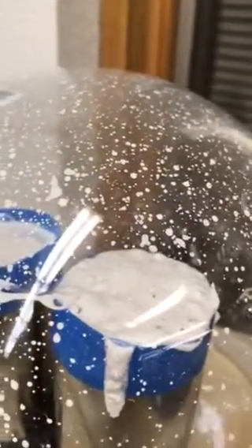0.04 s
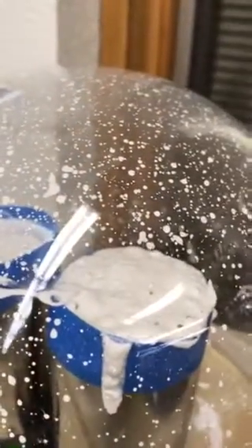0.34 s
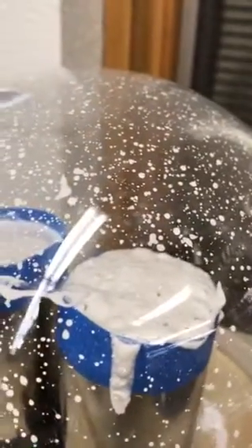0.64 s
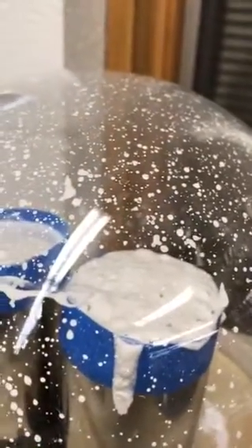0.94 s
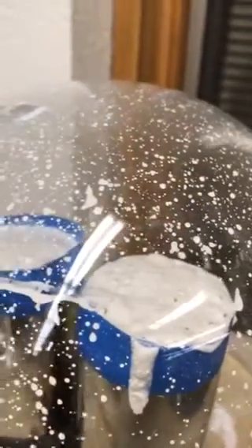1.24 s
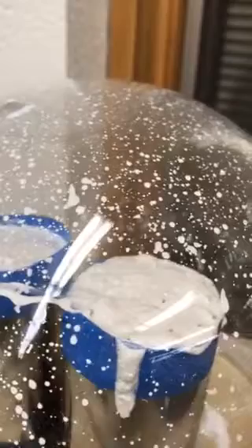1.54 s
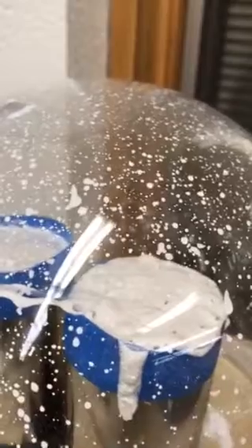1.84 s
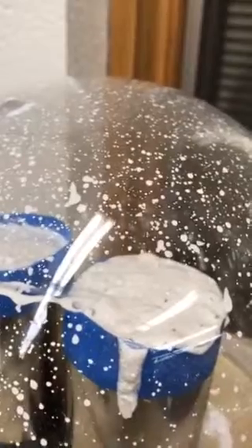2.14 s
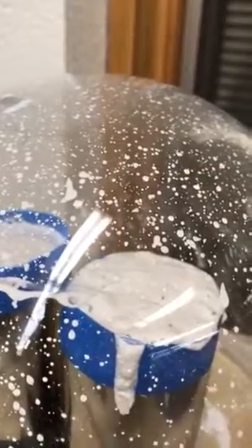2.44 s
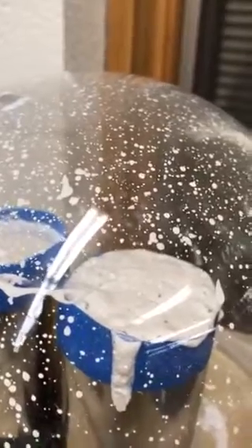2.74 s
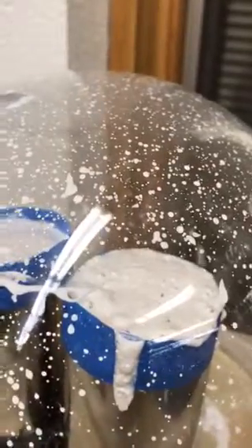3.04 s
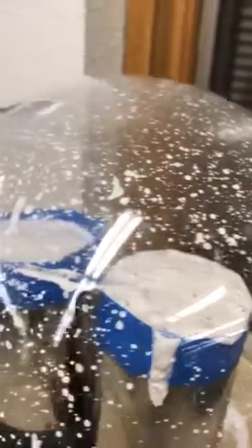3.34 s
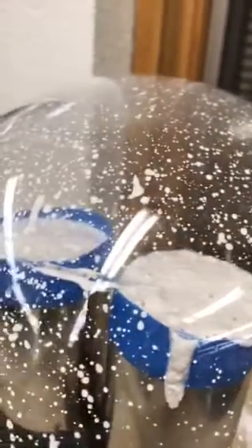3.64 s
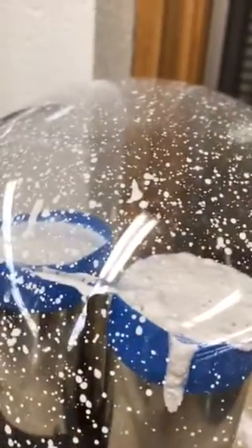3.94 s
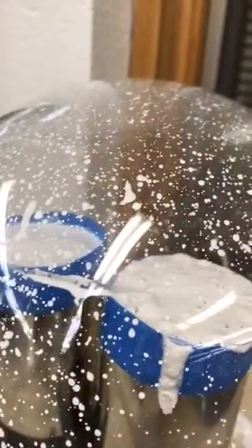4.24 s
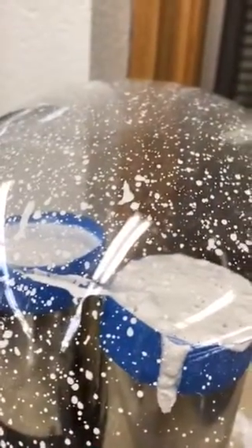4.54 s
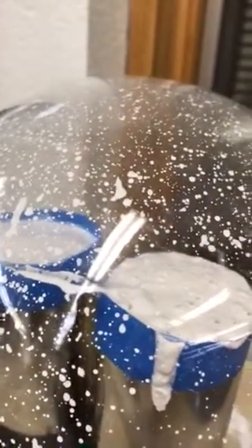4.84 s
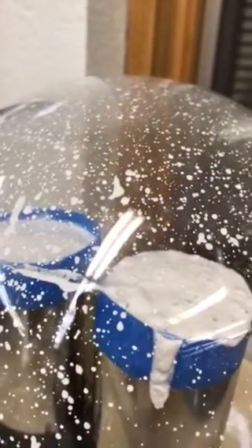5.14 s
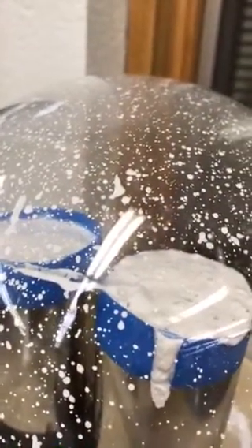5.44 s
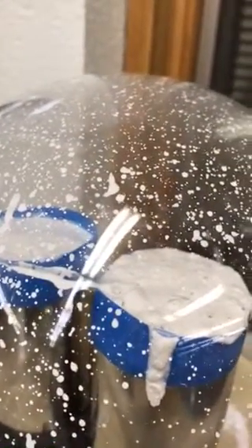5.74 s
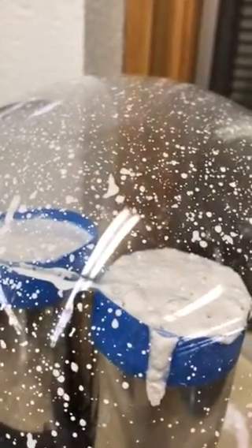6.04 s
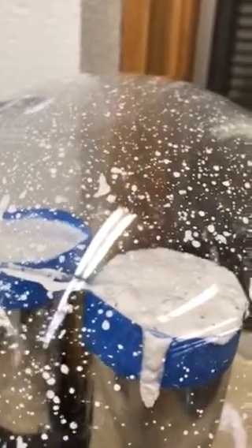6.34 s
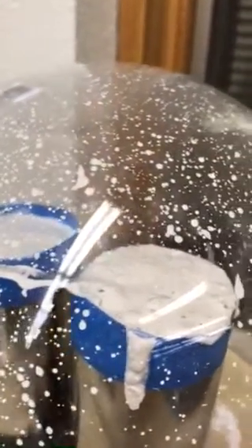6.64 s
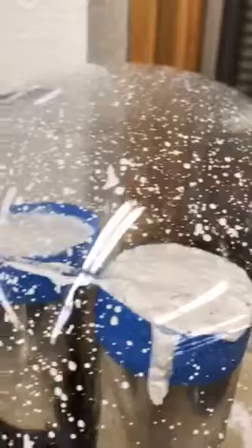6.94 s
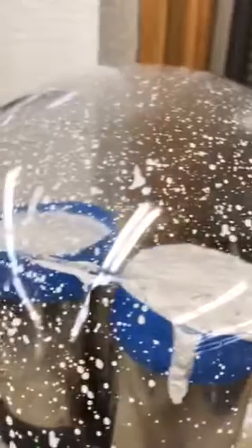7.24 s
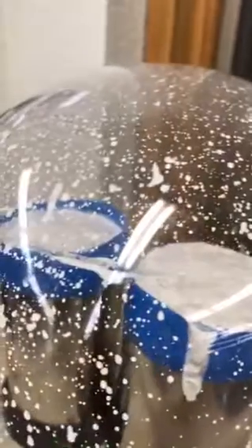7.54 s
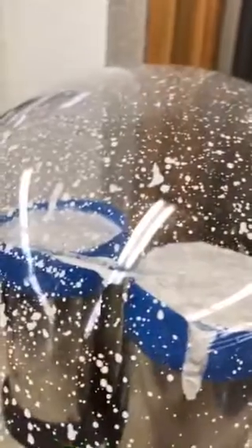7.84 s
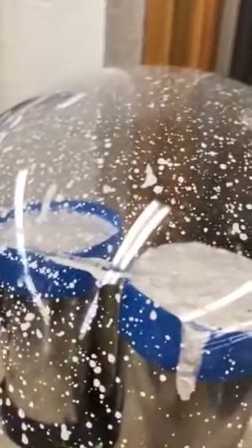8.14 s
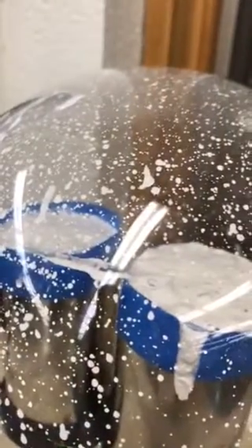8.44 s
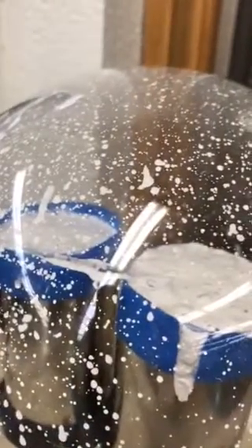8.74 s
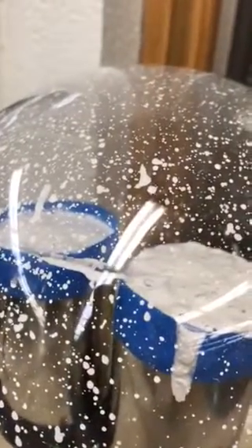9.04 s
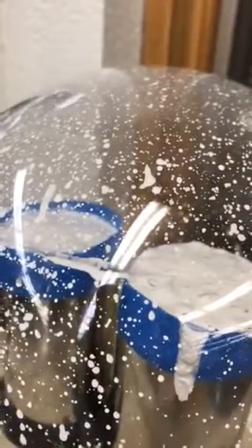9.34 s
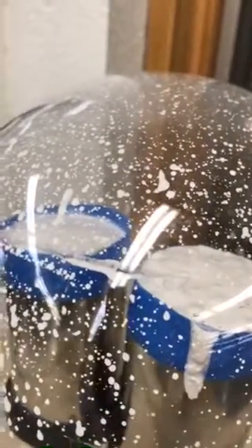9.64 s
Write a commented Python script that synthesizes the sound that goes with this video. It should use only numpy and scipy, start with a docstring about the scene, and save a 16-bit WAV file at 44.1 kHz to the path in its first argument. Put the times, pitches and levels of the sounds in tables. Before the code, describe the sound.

A vacuum pump is already running at the start and continues without a break for about ten seconds, heard from nearby in a workshop. The loudest sound is a deep, steady electric motor hum that throbs gently about three times a second.

Over it, much quieter, the exhaust valve makes a rapid faint ticking that breaks into short, ragged bouts of metallic chatter several times a second. Each bout briefly rings the casing and a loose cover, then dies quickly. The chatter is a little stronger just after the start, around 4 seconds, near 5.1 seconds, and around 6.2, 7.3 and 8.3 seconds.

Behind this lie a fluttering mid-pitched motor whirr, a soft gritty grind from the bearings and a thin, flickering high hiss. The pump's speed and overall loudness stay the same to the end.

```python
"""A low, slowly throbbing hum with a ragged chatter on top: a rotary-vane vacuum pump in a workshop.
Its induction motor hums at twice the mains rate and beats against the vane strokes on the shaft.
The chamber is under vacuum, so with almost no air left to move the oil-covered exhaust valve chatters
in irregular bouts, one burst a turn, ringing the casing and a loose cover. Behind that, close motor
lines flutter in the frame, the bearings grind and the vanes hiss."""
import sys
import numpy as np
from scipy.fft import rfft, irfft, next_fast_len
from scipy.io import wavfile
from scipy.ndimage import map_coordinates

SR = 44100
rng = np.random.default_rng(int(sys.argv[2]) if len(sys.argv) > 2 else 0)


def store_pcm(level_fs):
    """Save levels as 16-bit WAV."""
    pcm = np.round(np.clip(level_fs, -1, 1) * 32767).astype(np.int16)
    wavfile.write(sys.argv[1], SR, np.atleast_2d(pcm).T)


N = 426447

MAINS_HZ, SHAFT_HZ = 59.9743, 29.2895
HUM_PEAK_S, WHINE_PEAK_S = .11, .572  # moments when the lines of hum and of whine swell together
BAND_LIMIT_HZ = 15750

# bouts of valve chatter: (time [s], length [turns], level [dB], mid offset [dB], top offset [dB])
CHATTER_BOUTS = [(.025, 2, -50.5, -6, -9), (.128, 3, -47.5, -15, -10.5), (.367, 1, -53, -6, -11),
                 (.469, 2, -52, -10, -13), (.537, 1, -50.5, 5, -8), (.842, 2, -51, -16, -15),
                 (1.187, 3, -50.5, -12, -10), (1.326, 2, -51, -2, -6), (1.527, 1, -51, -6, -14),
                 (1.7, 3, -52.5, -10, -10), (1.936, 1, -55, -7, -13), (2.003, 2, -55, -5, -8),
                 (2.125, 2, -53.5, -7, -11), (2.448, 1, -49, 1, -3), (2.689, 1, -51, -3, -9),
                 (2.893, 1, -49, -1, -9), (3.134, 2, -50.5, 0, -6), (3.404, 1, -50.5, -6, -16),
                 (3.714, 1, -54.5, -10, -10), (3.779, 2, -53, -2, -8), (3.955, 1, -53, -2, -16),
                 (3.986, 2, -44.5, -8, -20), (4.057, 2, -47.5, -3, -17), (4.224, 2, -52.5, -7, -6),
                 (4.395, 1, -54.5, -12, -12), (4.498, 2, -50.5, -10, -8), (4.602, 2, -52.5, -6, -6),
                 (4.735, 1, -52.5, 5, -6), (4.943, 3, -50, -12, -10), (5.146, 1, -46, -4, -12),
                 (5.386, 2, -50, -7, -9), (5.658, 1, -50.5, -9, 0.5), (5.831, 1, -57, -10, -5),
                 (6.239, 3, -48, -2, -15), (6.476, 1, -49.5, 6, -13), (6.717, 1, -50, -4, -7),
                 (6.889, 1, -52, -8, -20), (7.098, 1, -58.5, 5.5, -8), (7.198, 1, -53, -3, -14),
                 (7.23, 2, -48.5, -2, -16), (7.331, 3, -48.5, -11, -11), (7.673, 1, -57, 9, -7),
                 (7.774, 1, -51, -14, -7), (7.98, 1, -53.5, -12, -13), (8.05, 3, -50, -9, -8),
                 (8.321, 1, -48, -3, -9), (8.698, 2, -49, -6, -8), (8.87, 1, -54, -12, -7),
                 (8.935, 1, -52.5, -9, -10), (9.139, 1, -54.5, -2, -4), (9.546, 2, -56, -8, -6)]
# faint valve bursts between the bouts: (low [dB], mid [dB], high [dB], top [dB])
IDLE_BURST_DB = [-63.5, -68, -66, -73]
# casing modes in four groups, low, mid, high and top: (frequency [Hz], width [Hz], gain [dB])
CASING_MODES = [
    [(1150, 19, 0.5), (1441, 66, -3), (1618, 63, 1.5)],
    [(2019, 32, -1), (2213, 26, 0), (2380, 53, -15.5)],
    [(2623, 17, 3), (2934, 32, -5), (3190, 29, -3.5), (3320, 20, -7), (3496, 75, -4.5), (3664, 27, -7),
     (3708, 17, -1.5)],
    [(4400, 32, 2), (4920, 70, -14), (5430, 160, -12.5)],
]
# tone colour of the valve's bare impacts: (frequency [Hz], gain [dB])
IMPACT_SPECTRUM = [(900, -12), (2500, 1.5), (4100, -0.5), (5500, -2), (9000, -3), (12000, -11.5),
                   (15000, -15.5)]
# steady vibration lines of motor and frame: (frequency [Hz], level [dB])
FRAME_LINES = [(87.8, -63), (149.2, -57.5), (178.2, -59), (210.6, -66), (239.9, -60), (269.2, -60),
               (295.7, -64), (322.2, -61), (325, -59), (330.5, -65), (359.9, -59), (479.8, -69),
               (599.7, -69), (839.6, -68), (1118.5, -70), (1358.4, -65), (1718.3, -69), (1776.8, -70),
               (1838.2, -70), (1933, -67.5), (1997.1, -71), (2225.8, -67), (4422, -78), (4570, -76),
               (7004, -75), (7062, -71.5)]
# tone colour of the motor's rumble: (frequency [Hz], gain [dB])
RUMBLE_SPECTRUM = [(20, -18.5), (35, -10), (55, -2.5), (120, -2), (190, -2), (220, -7), (280, -5),
                   (345, -4.5), (385, -10.5), (440, -18.5), (530, -8), (580, -14.5), (660, -3), (760, -6.5),
                   (830, -10.5), (920, -20.5), (1200, -36), (2000, -59.5)]
# motor lines on the frame's resonance, each at the sum of two multiples:
# (shaft multiple [-], mains multiple [-], level [dB rms])
WHINE_LINES = [(0, 12, -53), (29, -2, -63), (25, 0, -52.5), (17, 4, -64), (13, 6, -61), (1, 12, -55.5),
               (30, -2, -54), (2, 12, -62)]
# tone colour of the bearings: (frequency [Hz], gain [dB])
BEARING_SPECTRUM = [(600, -48), (950, -6), (1250, 0), (1500, -1), (1780, 2), (2050, 4.5), (2130, -12),
                    (2230, 2), (2420, 2.5), (2530, -15.5), (2660, 6), (2950, -11), (3600, -8.5), (4200, -7),
                    (6000, -45)]
# tone colour of the scraping vanes: (frequency [Hz], gain [dB])
VANE_SPECTRUM = [(2000, -45), (3200, -6), (4200, -13), (4480, -13), (4720, -5.5), (5200, 1.5), (5650, 4),
                 (6250, -3.5), (7030, -1.5), (7700, -7), (8200, -25.5), (8800, -6), (10500, -13),
                 (12000, -22), (16000, -9)]
# housing resonances that colour the vanes' hiss: (frequency [Hz], width [Hz], gain [dB])
HOUSING_MODES = [(4440, 210, -6), (5710, 280, -1.5), (6950, 260, -2), (8700, 320, -9.5), (12400, 440, -11)]
# tone colour of the fine oily hiss: (frequency [Hz], gain [dB])
OIL_SPECTRUM = [(4000, -29.5), (8000, -2.5), (10500, -9.5), (11500, -1), (12300, -1), (13600, -1),
                (14600, 1.5), (15700, -3.5)]


def motor_hum(t, turns):
    """Magnetic pull at twice the mains rate beats with the second harmonic of the two vanes' stroke."""
    strokes = 2 * turns
    magnetic = tone(2 * MAINS_HZ * (t - HUM_PEAK_S), db=-22)
    return magnetic + tone(strokes, db=-40.5) + tone(2 * strokes, db=-50.5)


def valve_burst(t, attack_s=0.00084, hold_s=0.012, t60_s=0.13):
    """Envelope of one burst: the valve buzzes briefly on its seat, then the room lets the sound die."""
    return (1 - np.exp(-t / attack_s)) * amp(-60 * np.maximum(t - hold_s, 0) / t60_s)


def valve_force(lift_phase=.72, fade_db_per_turn=1.15, idle_scatter_db=2.5):
    """The valve lifts once a turn, faintly as a rule, hard in a bout. One envelope per mode group."""
    turn_count = int(N / SR * SHAFT_HZ) + 1
    levels_db = np.array(IDLE_BURST_DB) + idle_scatter_db * rng.standard_normal((turn_count, 1))
    for start_s, length, db, mid_db, top_db in CHATTER_BOUTS:
        first_turn = round(start_s * SHAFT_HZ - lift_phase)
        for k in range(round(length)):
            levels_db[first_turn + k] = db - fade_db_per_turn * k + np.array([0, mid_db, 0, top_db])
    burst = valve_burst(np.arange(SR // 3) / SR)
    power = np.zeros((len(CASING_MODES), N + SR))
    for turn, db in enumerate(levels_db):
        onset = round((turn + lift_phase) / SHAFT_HZ * SR)
        power[:, onset:onset + len(burst)] += (amp(db)[:, None] * burst) ** 2
    return np.sqrt(power[:, :N])


def valve_chatter(force, group_db=(-0.3, 0.6, 1.0, -2.0)):
    """Each burst is a spatter of tiny impacts that rings the casing's mode groups in its own blend."""
    strength = np.sqrt(np.mean(force ** 2, axis=1))
    impacts = force * rng.standard_normal(N) * amp(2.74 * wobble(1500))
    casing = sum(amp(db) * strength[k] * ring(impacts[k], CASING_MODES[k])
                 for k, db in enumerate(group_db))
    # the hardest impacts also reach the air directly
    crisp = amp(-1.0) * strength[-1] * coloured(impacts[-1], IMPACT_SPECTRUM)
    return casing + crisp


def loose_cover(buzz, hz=1146, width_hz=16, relative_db=-11.5):
    """The valve's buzz keeps one mode of a loose cover singing, now more, now less."""
    singing = ring(buzz * rng.standard_normal(N), [(hz, width_hz, 0)])
    return amp(relative_db) * np.sqrt(np.mean(buzz ** 2)) * singing


def frame_whirr(t, turns):
    """Lines of motor and frame flutter together, over a rumble that recurs with the motor's slip."""
    shaft_time = turns / SHAFT_HZ
    lines = sum(tone(hz * shaft_time + rng.random(), db) for hz, db in FRAME_LINES)
    slip_beat_hz = 2 * (MAINS_HZ - 2 * SHAFT_HZ)
    rumble = coloured(cyclic_noise(slip_beat_hz * t, slip_beat_hz, share=0.66), RUMBLE_SPECTRUM)
    return amp(0.1) * lines + amp(-47.5) * rumble


def slot_whine(turns, scatter_cycles=0.077):
    """Rotor slots and mains pull drive close lines in the frame, beating in a quick, limping flutter."""
    shaft_time = turns / SHAFT_HZ + HUM_PEAK_S - WHINE_PEAK_S
    lines = [(k * SHAFT_HZ + m * MAINS_HZ, db) for k, m, db in WHINE_LINES]
    return sum(tone(hz * shaft_time + scatter_cycles * rng.standard_normal(), db) for hz, db in lines)


def bearing_grind(turns):
    """The bearings roll over the same rough spots each turn: a soft, gritty grind."""
    grit = amp(1.3 * wobble(500))
    grind = coloured(grit * cyclic_noise(turns, SHAFT_HZ, share=.6), BEARING_SPECTRUM)
    swell = amp(0.29 * np.cos(2 * np.pi * turns))
    return amp(-57.0) * swell * grind


def vane_hiss(turns):
    """The vanes scrape the same rough spots each turn and ring the housing, more where oil is thin."""
    def scrape(share):
        grit = amp(2.3 * wobble(900))
        return near_walls(grit * cyclic_noise(turns, SHAFT_HZ, share), gain_db=-9)

    hiss = amp(-58.0) * coloured(scrape(share=0.45), VANE_SPECTRUM)
    housing = amp(-61.0) * ring(scrape(share=0.88), HOUSING_MODES)
    oil_film = amp(0.35 * wobble(17) + 0.4 * wobble(30))
    return oil_film * (hiss + housing)


def oil_hiss(turns):
    """A fine oily hiss swells with every vane stroke, twice a turn."""
    flicker = amp(1.5 * wobble(1500) + 0.84 * wobble(45))
    spray = near_walls(cyclic_noise(turns, SHAFT_HZ, share=0.45), gain_db=-18)
    stroke = amp(1.3 * np.cos(2 * np.pi * 2 * turns))
    return amp(-60.0) * stroke * coloured(flicker * spray, OIL_SPECTRUM)


def near_walls(x, gain_db, max_delay_s=.02, count=6):
    """Bench and walls within a few metres add weak echoes that comb the hiss; at rms 1."""
    delays = rng.uniform(0, max_delay_s, count)
    echoes = sum(np.roll(x, round(delay * SR)) for delay in delays)
    return unit(x + amp(gain_db) * echoes)


def amp(db):
    """Decibels as an amplitude factor."""
    return 10 ** (np.asarray(db) / 20)


def unit(x):
    """x at rms 1."""
    return x / np.sqrt(np.mean(x ** 2) + 1e-20)


def tone(cycles, db):
    """A sine of a given rms level."""
    return np.sqrt(2) * amp(db) * np.cos(2 * np.pi * cycles)


def wobble(rate):
    """A smooth random curve, rate knots a second."""
    knots = rng.standard_normal(int(N * rate / SR) + 4)
    return map_coordinates(knots, [np.arange(N) * rate / SR])


def cyclic_noise(cycles, rate_hz, share):
    """Noise with a share of its power looping every cycle; the rest is always new."""
    loop = rng.standard_normal(round(SR / rate_hz))
    repeated = map_coordinates(loop, [cycles % 1 * len(loop)], mode="grid-wrap")
    return np.sqrt(share) * unit(repeated) + np.sqrt(1 - share) * rng.standard_normal(N)


def filtered(x, response):
    """x through a complex frequency response."""
    size = next_fast_len(N + SR // 2)
    hz = np.fft.rfftfreq(size, 1 / SR)
    return irfft(rfft(x, size) * response(hz), size)[:N]


def coloured(x, spectrum):
    """x through an EQ curve drawn on a log frequency axis, at rms 1."""
    points_hz, db = np.transpose(spectrum)
    return unit(filtered(x, lambda hz: amp(np.interp(np.log(hz + 1), np.log(points_hz), db))))


def ring(x, modes):
    """x through a bank of resonances of alternating polarity, at rms 1."""
    def body(hz):
        return sum((-1) ** k * amp(db) * 1j * hz * width / (centre ** 2 - hz ** 2 + 1j * hz * width)
                   for k, (centre, width, db) in enumerate(modes))

    return unit(filtered(x, body))


def scene():
    """The running pump in mono: hum and chatter in front, whirr and friction behind."""
    t = np.arange(N) / SR
    speed_hz = SHAFT_HZ * (1 + 0.000402 * wobble(3) + 0.000514 * wobble(25))  # the load varies slightly
    turns = np.cumsum(speed_hz) / SR - SHAFT_HZ * HUM_PEAK_S
    force = valve_force()
    motor = motor_hum(t, turns) + frame_whirr(t, turns) + slot_whine(turns)
    friction = bearing_grind(turns) + vane_hiss(turns) + oil_hiss(turns)
    chatter = valve_chatter(force) + loose_cover(buzz=force[0])
    return (motor + chatter + friction)[None]


def record(dry):
    """A brick-wall low-pass takes off the very top of the hiss."""
    return filtered(dry[0], lambda hz: hz < BAND_LIMIT_HZ)[None]


dry = scene()
out = record(dry)
store_pcm(out)
```